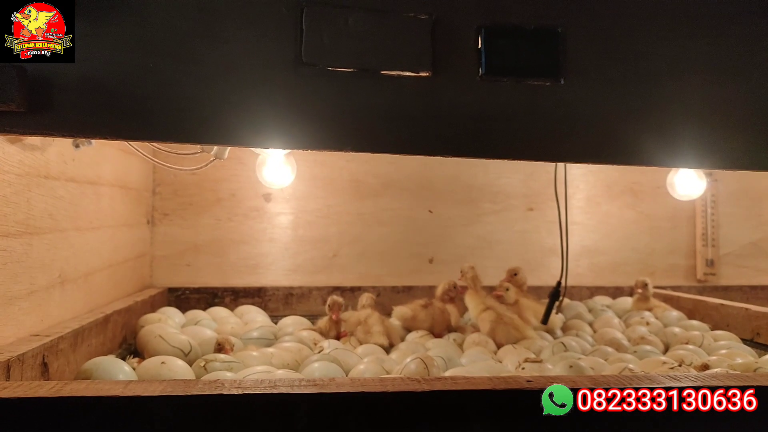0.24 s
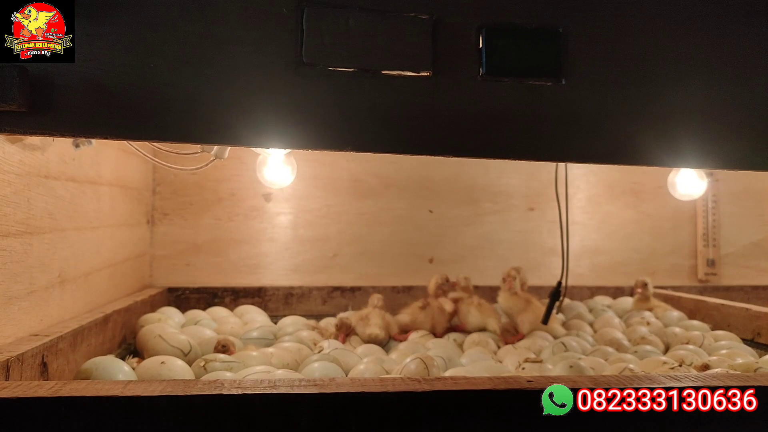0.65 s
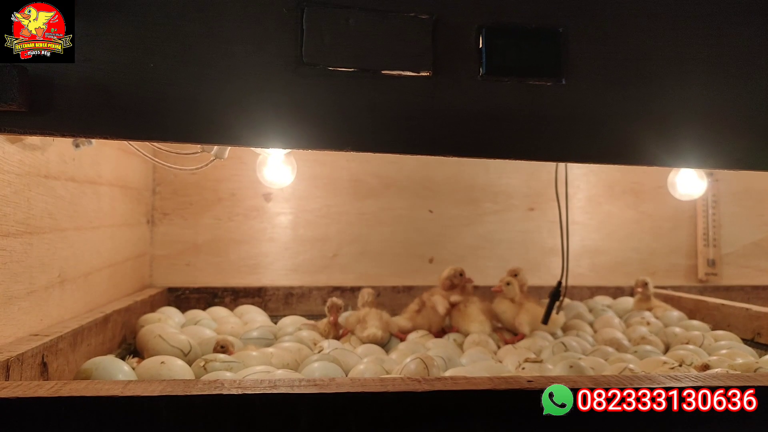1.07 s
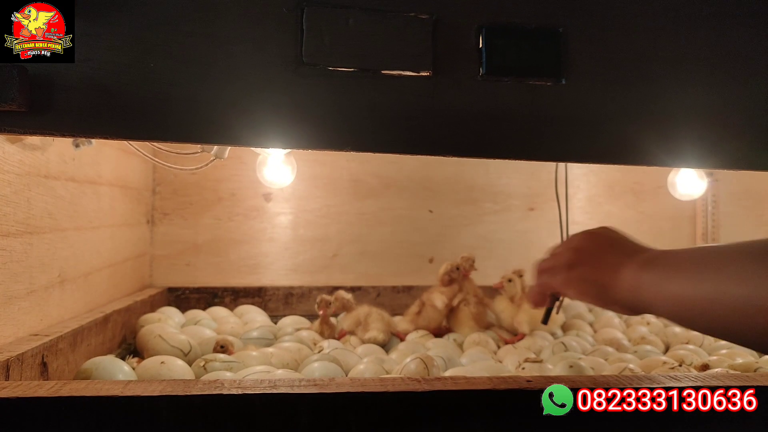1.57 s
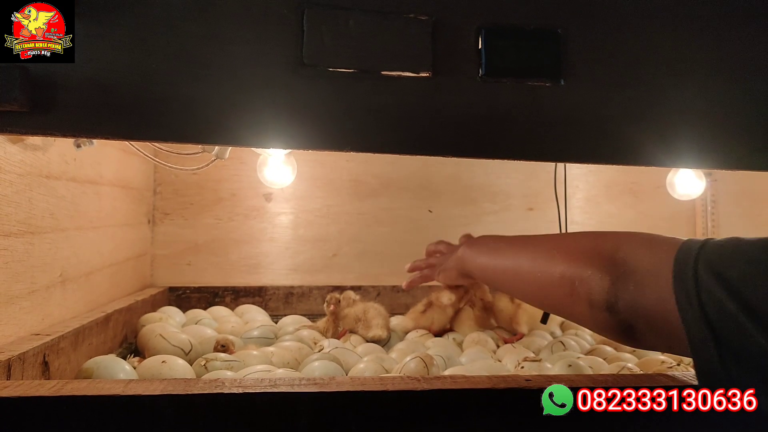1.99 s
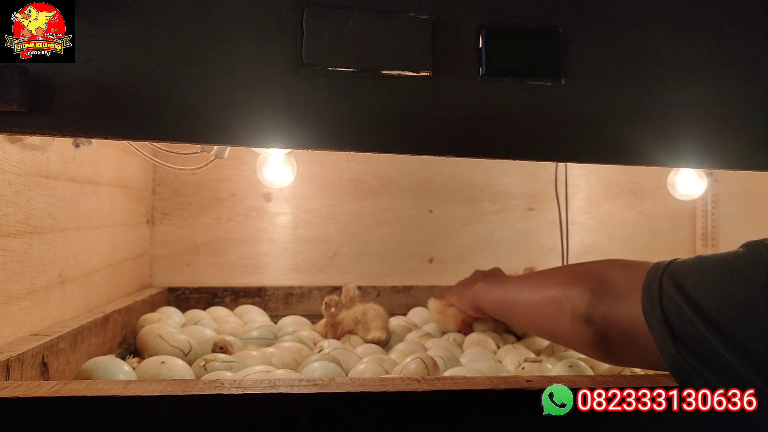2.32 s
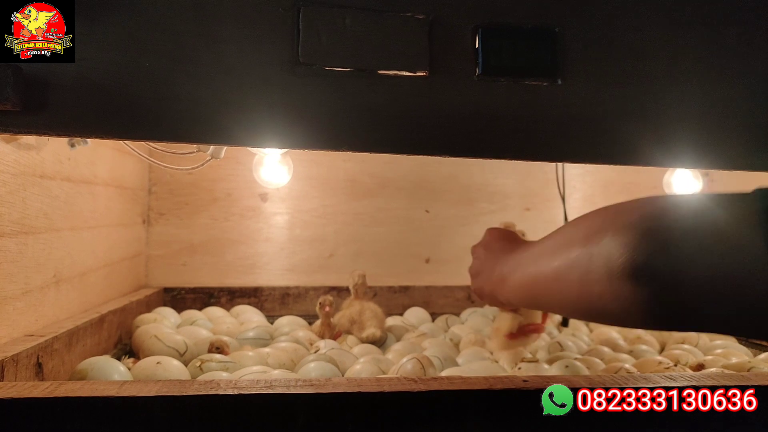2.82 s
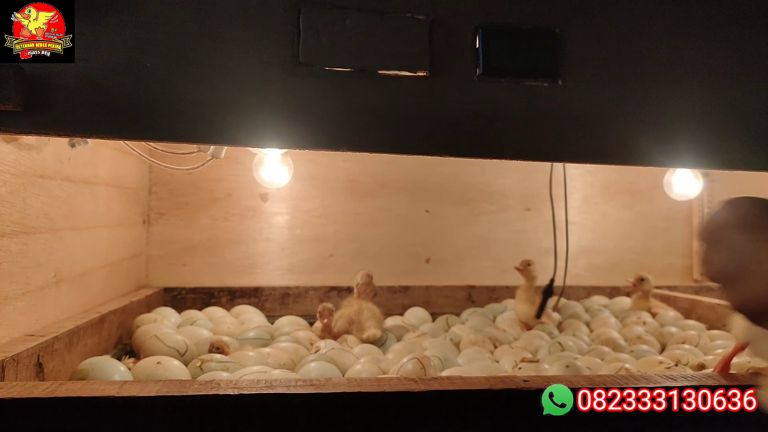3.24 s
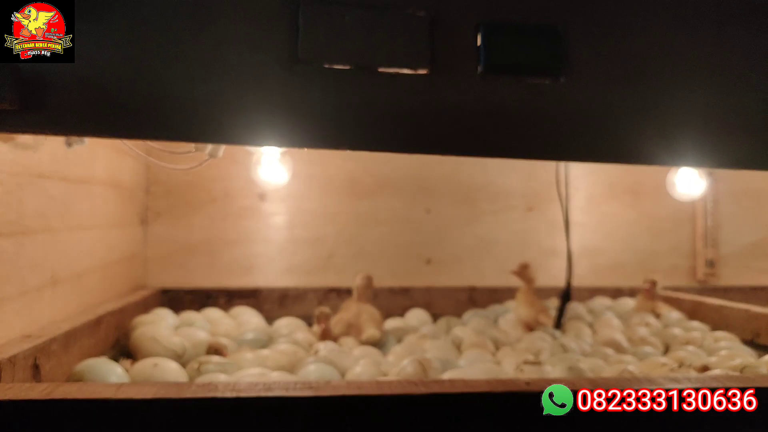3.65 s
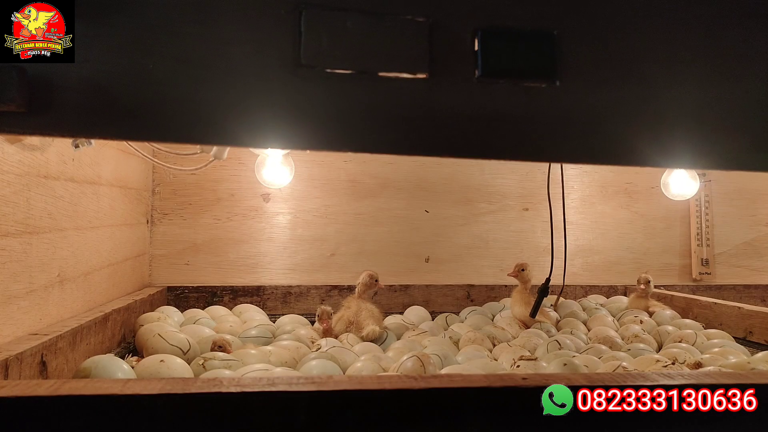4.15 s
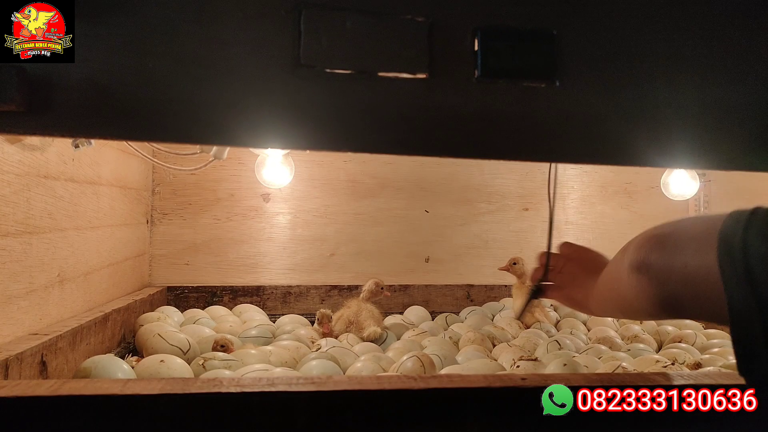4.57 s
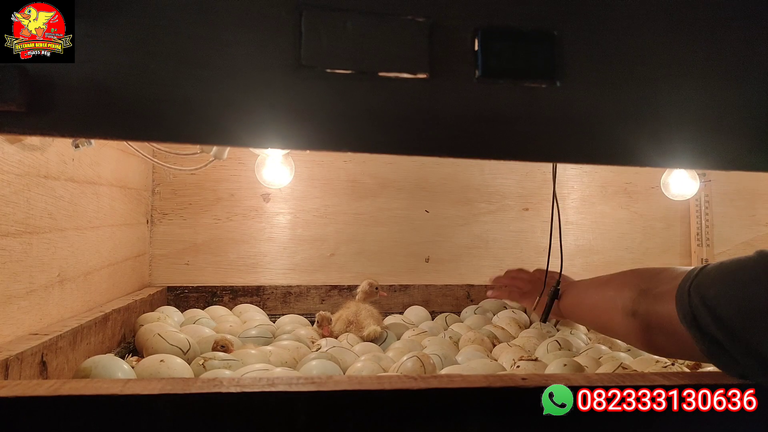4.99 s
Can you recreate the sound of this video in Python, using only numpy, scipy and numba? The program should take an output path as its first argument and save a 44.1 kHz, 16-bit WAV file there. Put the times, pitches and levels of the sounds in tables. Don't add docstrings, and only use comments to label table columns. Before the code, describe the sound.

A phone held close over a wooden box picks up shell taps and dull bumps first, then scattered thin peeps and a broad straw swish. Low tray knocks precede a carried duckling's climbing whistles and several shrill, raspy squeals, leaning left. Later a sharp double clack and grating hit the wood, followed by soft scuffing. Faint cricket chirps and low handling rumble lie beneath, in quiet hissy air.

```python
import sys
import numpy as np
from scipy import signal
from scipy.io import wavfile
from scipy.ndimage import uniform_filter1d, map_coordinates
from numba import njit

SR = 44100
rng = np.random.default_rng(int(sys.argv[2]) if len(sys.argv) > 2 else 0)


def linear_from_db(decibels):
    return 10 ** (np.asarray(decibels, float) / 20)


def wrap_up_sound(samples):
    columns = np.atleast_2d(samples).T
    tamed = np.clip(columns, -1, 1)
    steps = np.round(tamed * 32767).astype(np.int16)
    wavfile.write(sys.argv[1], SR, steps)


N = 229143
T = np.arange(N) / SR

# frequency in Hz, density in dB per Hz.
AIR_SPECTRUM = [(15, -31), (25, 4.5), (69, -6.5), (227, -14.5), (600, -21), (1600, -31), (2770, 6),
                (3930, -28.5), (6050, 2.5), (6550, 2), (7100, -12.5), (8580, -11), (11500, -67.5),
                (15500, -7)]
# time in seconds, level in dB, centre in Hz.
FAR_DRONE = [
    (3.25, -104, 1090),
    (3.28, -77, 1110),
    (3.374, -75.5, 1220),
    (3.442, -71.5, 1016),
    (3.716, -75.5, 960),
    (3.82, -88, 1240),
    (3.917, -67.5, 913),
    (4.078, -72.5, 1257),
    (4.15, -106, 1230),
]
# time in seconds, peak level in dB.
CHIRPS = [(0.326, -54), (0.4594, -55), (0.595, -57.5), (0.722, -60.5), (0.8544, -60), (1.522, -59),
          (1.653, -62.5), (1.9405, -75), (2.2248, -78), (2.3466, -64), (2.5002, -57), (2.635, -59),
          (2.7586, -61), (2.891, -52.5), (3.043, -63.5), (3.298, -55), (3.7, -61.5), (3.9709, -57),
          (4.2351, -65), (4.363, -56.5), (4.6314, -69), (4.762, -57.5), (4.8758, -59), (5.025, -60.5),
          (5.1597, -60.5)]
# peak in seconds, swell in seconds, fade in seconds, level in dB.
GRIPS = [
    (0.03, 0.13, 0.33, -66),
    (2.29, 0.4, 0.33, -80.5),
    (2.519, 0.17, 0.87, -74.5),
    (2.87, 0.14, 0.29, -68.5),
    (4.6, 0.24, 0.35, -60.5),
    (4.85, 0.19, 0.3, -65),
    (5.2, 0.32, .3, -73),
]
# time in seconds, peak level in dB, panel mode in Hz, ring T60 in seconds.
KNOCKS = [(0.054, -55, 180.7, 0.28), (0.133, -48, 377, 0.092), (0.361, -69, 345, 0.12),
          (2.092, -60.5, 143, 0.19), (2.23, -47.5, 152, 0.24), (2.443, -46.5, 155.6, 0.19),
          (2.821, -51, 124.5, 0.31), (3.277, -69.5, 306, 0.27), (4.505, -49.5, 123.4, 0.27),
          (4.573, -39, 131.4, 0.37), (5.045, -64.5, 259, 0.5)]
# time in seconds, level in dB, mode in Hz, ring T60 in seconds.
HOLLOW_KNOCKS = [
    (2.85, -60, 740, 0.3),
    (3.67, -66.5, 550, 0.46),
    (4.44, -32.5, 900, 0.041),
    (4.438, -41, 1800, 0.079),
    (4.962, -66.5, 960, 0.26),
    (4.565, -38, 1500, 0.091),
    (2.68, -71, 640, 0.24),
]
# time in seconds, peak in dB, bass share in dB, ring T60 in seconds.
SHELL_TAPS = [(0.0506, -44.5, -25, 0.25), (0.1395, -36.5, -3, 0.15), (0.3663, -39, 3, 0.21),
              (1.3179, -49, -13.5, 0.36), (2.0556, -46.5, -36, 0.33), (4.4364, -49, 16.5, 0.13),
              (4.5, -73, 26.5, 0.62), (4.5565, -49.5, -7, 0.25), (4.6877, -52, 15, 0.12),
              (5.0245, -59, 12, 0.15), (2.8075, -36, -30, .04), (.7208, -62, -8, .15),
              (1.0176, -50, -3, .3), (1.0565, -42, -10, .3), (3.5015, -40, -30, .04),
              (3.187, -40, -30, .04), (4.0746, -50, -8, .15), (2.3625, -64, -5, .2)]
# peak in seconds, swell in seconds, fade in seconds, level in dB.
SCRAPES = [
    (4.565, 0.04, .14, -39.5),
    (4.6, .04, .06, -43),
    (4.44, .008, .06, -58),
    (4, 0.0087, 0.067, -71),
]
# frequency in Hz, density in dB per Hz.
STRAW_SPECTRUM = [(71, -61), (120, -37.5), (276, -11.5), (509, -9), (623, -11.5), (733, -6), (1190, -8.5),
                  (1270, -3.5), (2390, 5.5), (3170, -1.5), (4000, -16), (5300, -2), (6700, -1),
                  (15500, -13.5)]
# peak in seconds, swell in seconds, fade in seconds,
# level in dB, bass cut in dB per octave.
SWISHES = [(0.0, .02, 0.094, -57, 2), (0.141, 0.032, 0.19, -53, 3), (0.379, 0.039, 0.12, -59, 18),
           (.71, 0.1, .6, -77, 21), (1.69, 0.03, .3, -70, 2.5), (1.082, 0.13, 0.44, -47, 3.5),
           (1.135, .1, .3, -43, .6), (1.195, 0.17, 0.25, -38.5, 0.2), (1.821, 0.14, 0.82, -60.5, 3),
           (2.081, 0.15, .28, -62.5, 3.5), (2.441, 0.14, 0.36, -63.5, 2.5), (2.811, 0.072, 0.081, -57.5, 4),
           (3.21, 0.2, 0.36, -67, 5), (3.515, 0.1, 0.16, -58.5, 7), (3.831, 0.048, 0.31, -65, 1.5),
           (4.091, 0.064, 0.2, -56.5, 1.5), (4.44, 0.033, 0.14, -62.5, 5), (4.589, 0.076, 0.23, -56, 22),
           (4.92, 0.25, 0.3, -70.5, 18)]
# peak in seconds, swell in seconds, fade in seconds,
# level in dB, treble cut in dB per octave.
SCUFFS = [(0.0, .02, 0.068, -46.5, 3.5), (0.058, .03, 0.064, -47, 3.5), (.15, 0.065, 0.37, -49.5, 7.5),
          (.39, 0.034, .33, -46, 7), (0.499, 0.3, 0.16, -55, 8.5), (2.27, 0.051, 0.08, -72, 48),
          (2.458, 0.053, 0.22, -62, 9.5), (2.82, 0.046, 0.18, -57.5, 4), (4.532, 0.13, 0.59, -61, 6),
          (4.57, 0.038, 0.14, -40, 6.5), (4.829, 0.093, 0.2, -53.5, 11), (5.08, 0.091, 0.23, -47.5, 8.5),
          (5.2, 0.19, .2, -55, 8)]
# time in seconds, right port lag in seconds, left minus right in dB.
HAND_PATH = [
    (0.2, .00039, 2.5),
    (1.1, .00023, .7),
    (2, .00021, -.5),
    (2.8, .00022, 1.5),
    (3.8, .00027, 3),
    (4.6, .00014, -.7),
    (5.1, -.00028, .9),
]
# start in seconds, length in seconds, first pitch in Hz, top in Hz, level in dB.
RISING_PEEPS = [(.316, 0.038, 2950, 3270, -59.5), (.42, 0.058, 3000, 3520, -67),
                (.741, 0.047, 2290, 2747, -60.5), (0.828, 0.034, 3160, 3270, -62),
                (2.352, 0.065, 2830, 3227, -60), (2.732, .07, 3200, 3460, -55),
                (3.462, 0.031, 2385, 3480, -62.5), (3.565, .06, 3900, 4300, -63),
                (3.635, .015, 2400, 3450, -61), (3.764, .012, 3400, 4300, -58),
                (3.48, .022, 3300, 3480, -51), (1.625, .07, 3350, 3750, -66),
                (3.985, .035, 4350, 4780, -64), (4.415, .03, 2500, 3300, -58), (.99, .025, 2500, 2800, -63),
                (.385, .05, 3200, 3480, -62), (3.932, .065, 2890, 4350, -56),
                (4.04, 0.034, 2466, 3060, -54), (4.316, .085, 2900, 4700, -58),
                (4.807, 0.062, 3516, 4600, -60), (5.121, 0.068, 2460, 3050, -56)]
# start in seconds, length in seconds, top in Hz, last pitch in Hz, level in dB.
FALLING_PEEPS = [(.515, .03, 2880, 2300, -61), (.535, .035, 2450, 2250, -58),
                 (.564, 0.042, 3470, 2960, -59), (0.653, .12, 3627, 2920, -61.5),
                 (.945, 0.042, 3400, 2700, -59), (1.416, 0.054, 3700, 2993, -57),
                 (1.678, 0.022, 3300, 3100, -58), (1.762, 0.03, 4700, 2700, -60),
                 (1.778, .02, 3400, 3100, -56), (2.933, 0.055, 3400, 3140, -58),
                 (0.26, 0.042, 3220, 2170, -67), (0.637, 0.057, 3170, 2220, -65),
                 (.44, 0.046, 3420, 2370, -68), (3.622, 0.074, 4250, 2300, -57.5),
                 (3.798, .03, 3800, 2700, -52), (4.014, .048, 4780, 2900, -54),
                 (1.805, .05, 2080, 1980, -62), (.375, .04, 3100, 2200, -60), (.96, .03, 3100, 2500, -62),
                 (4.87, .04, 3900, 3000, -62), (4.39, .036, 4700, 2700, -55)]
# start in seconds, length in seconds, foot in Hz, top in Hz, level in dB.
ARCHED_PEEPS = [(.222, .06, 2300, 3250, -61), (.352, .04, 2420, 3150, -54),
                (.535, 0.023, 2880, 3154, -53.5), (0.614, 0.07, 2050, 3424, -56),
                (0.866, 0.042, 2200, 2520, -53.5), (0.884, 0.041, 2720, 3380, -56.5),
                (1.38, 0.075, 3900, 4650, -61), (3.066, 0.086, 2650, 3104, -68.5),
                (3.222, .07, 2620, 3586, -55), (4.01, .05, 2900, 3500, -64), (.93, .045, 2500, 3100, -63),
                (.545, .06, 2900, 3720, -63), (.66, .04, 2100, 2600, -65), (.75, .05, 2300, 2750, -62),
                (4.152, 0.08, 3300, 4060, -66)]
CRY_OVERTONES_DB = (-20, -25)
# time in seconds, pitch in Hz, level in dB.
CLIMBING_WHISTLES = [
    [(2.712, 4268, -103), (2.722, 4016, -73), (2.734, 4192, -57), (2.77, 4541, -50), (2.78, 4563, -55),
     (2.784, 4686, -48), (2.81, 4821, -49), (2.812, 4802, -52)],
    [(3.118, 4445, -75), (3.144, 4449, -46), (3.171, 4506, -51)],
    [(3.172, 4690, -47), (3.176, 4751, -43), (3.184, 4902, -49), (3.19, 4853, -49)],
    [(3.445, 4389, -74), (3.455, 4417, -59), (3.471, 4440, -53), (3.478, 4535, -57)],
    [(3.479, 4513, -56), (3.491, 4490, -45), (3.508, 4489, -49)],
    [(3.72, 4310, -80), (3.726, 4384, -70), (3.742, 4483, -74), (3.76, 4476, -65), (3.774, 4777, -64),
     (3.778, 4708, -72), (3.782, 4541, -63), (3.8, 4505, -51), (3.828, 4612, -47)],
]
# time in seconds, pitch in Hz, level in dB.
CALM_WHISTLES = [
    [(2.515, 3962, -74), (2.521, 4138, -81), (2.527, 4383, -64), (2.537, 4340, -62), (2.553, 4869, -61),
     (2.567, 4762, -60), (2.573, 4434, -73), (2.585, 4400, -72)],
    [(2.9, 3433, -77), (2.906, 3380, -70), (2.914, 3688, -71), (2.936, 3751, -61), (2.958, 3743, -62),
     (2.972, 4134, -54), (2.98, 4113, -55), (2.99, 4124, -67)],
    [(4.85, 3176, -70), (4.856, 3164, -60), (4.876, 3444, -53), (4.886, 3437, -48), (4.902, 3713, -48),
     (4.938, 3777, -55), (4.944, 3964, -62), (4.955, 3723, -67)],
]
# time in seconds, pitch in Hz, level in dB.
CLEAR_FLIP = [
    [(3.825, 4648, -48), (3.827, 4719, -49), (3.833, 5523, -62), (3.837, 5951, -45), (3.843, 6010, -41),
     (3.865, 6052, -56)],
]
# start in seconds, length in seconds, pitch in Hz, level in dB,
# roughness from 0 to 1.
SQUEALS = [
    (2.803, 0.03, 6060, -33.5, 0.8),
    (3.182, .05, 6000, -40, 0.96),
    (3.5, 0.048, 6145, -31.5, 0.76),
    (3.83, .07, 6000, -39, .9),
    (4.057, 0.12, 6080, -45, 0.8),
]
# start in seconds, length in seconds, first pitch in Hz,
# last pitch in Hz, level in dB.
TUMBLES = [
    (2.836, .028, 4900, 2600, -46),
    (2.566, .014, 4800, 3900, -58),
    (2.982, .016, 4150, 3000, -55),
    (3.864, .01, 4600, 3800, -51),
    (3.205, .02, 4900, 4000, -54),
    (3.53, .014, 5000, 3300, -53),
    (4.94, .012, 3900, 4250, -54),
]
# time in seconds, # right port lag in
# seconds, left minus right in dB.
DUCKLING_PATH = [
    (2.7, .0002, 3.5),
    (3.2, .00022, 4),
    (3.45, .00045, 8),
    (3.8, .0005, 10),
    (4.1, .00048, 7),
    (4.8, .00028, 1.5),
]


@njit
def svf(x, hz, width):
    y, b, l = np.empty(len(x)), 0., 0.
    for i in range(len(x)):
        centre = hz[i % len(hz)]
        g, k = np.tan(np.pi * centre / SR), width / centre
        v = (b + g * (x[i] - l)) / (1 + g * (g + k))
        b, l, y[i] = 2 * v - b, l + 2 * g * v, k * v
    return y


def band(x, hz, width_hz):
    hz = np.atleast_1d(1. * hz)
    y = svf(svf(x, hz, 1. * width_hz), hz, 1. * width_hz)
    return y / np.std(y)


def noise_band(hz, width_hz):
    return band(rng.standard_normal(N), hz, width_hz)


def walk(rate):
    k = int(SR / rate)
    held = np.repeat(rng.standard_normal(N // k + 1), k)
    return 1.36 * uniform_filter1d(uniform_filter1d(held, k), k)[:N]


def colour(table, hz):
    table_hz, table_db = np.array(table).T
    return np.interp(np.log(hz), np.log(table_hz), table_db)


def bursts(times, dbs, rise, t60s):
    out = np.zeros(N)
    for s, db, t60 in zip(times, dbs, t60s):
        age = np.maximum(T[int(s * SR):int((s + 1.5 * t60) * SR)] - s, 0)
        out[int(s * SR):][:len(age)] += linear_from_db(db) * np.minimum(age / rise, 1) * 1000 ** (-age / t60)
    return out


def swell(t, table):
    s, rise, fade, db = np.transpose(table)[:4, :, None]
    return db - 40 * np.where(t < s, ((s - t) / rise) ** 2, (t - s) / fade)


def path(table):
    s, *columns = np.transpose(table)
    return [np.interp(T, s, column) for column in columns]


def ports(x, lag_s, pan_db):
    late = map_coordinates(x, [(T - lag_s) * SR], mode="mirror")
    return np.array([x * linear_from_db(pan_db / 2), late * linear_from_db(-pan_db / 2)])


def walls(x):
    t60_s, first_echo_s = 0.21, 0.0031
    age = np.arange(int(.4 * SR)) / SR
    tail = rng.standard_normal((2, len(age))) * 1000 ** (-age / t60_s)
    tail *= np.clip(age / first_echo_s - 1, 0, 1)
    return signal.oaconvolve(x[None], tail / np.sqrt(np.sum(tail ** 2) / 2), axes=1)[:, :N]


def hush(x):
    size = int(0.026 * SR)
    power = np.abs(uniform_filter1d(uniform_filter1d(x ** 2, size), size))
    db = 10 * np.log10(power + 1e-12)
    return np.clip(0.65 * (db + 63.5), -10, 0)


def air(hush_db):
    out, opposite = 0, np.array([[1], [-1]])
    for hz in 30 * 2 ** (np.arange(19) / 2):
        mid, side = (noise_band(hz, hz / 2.12) for _ in range(2))
        db = colour(AIR_SPECTRUM, hz) + 10 * np.log10(hz)
        db = db + 4 * walk(6) + 3 * walk(20)
        db = db + hush_db * min((hz / 2500) ** 2, 1)
        out = out + linear_from_db(db) * (mid + min(hz / 220.0, 1) * side * opposite)
    level_db = -71
    return out * linear_from_db(level_db) / np.std(out)


def drone():
    s, db, hz = np.transpose(FAR_DRONE)
    centre_hz = np.interp(T, s, hz)
    level_db = np.interp(T, s, db, -120, -120) + 1.9 * walk(13)
    return linear_from_db(level_db) * band(noise_band(centre_hz, 460), centre_hz, 460)


def cricket():
    s, db = np.transpose(CHIRPS)
    teeth = 1 + .7 * np.sin(2 * np.pi * 95 * T)
    return bursts(s - .012, db - 2, .015, .15 + 0 * s) * teeth * noise_band(6650, 450)


def rumble():
    rest_db = -88.5
    grip = linear_from_db(rest_db) + np.sum(linear_from_db(swell(T, GRIPS)), axis=0)
    common, opposed = (noise_band(75, 70) for _ in range(2))
    return grip * linear_from_db(2.5 * walk(25)) * (common + .3 * opposed * np.array([[1], [-1]]))


def knocks():
    out, blur = np.zeros(N), noise_band(287, 210)
    modes = ((1, 2), (1.55, -7.5), (2.3, -11))  # (pitch ratio, dB)
    for s, db, hz, t60 in list(KNOCKS) + list(HOLLOW_KNOCKS):
        at = int(s * SR)
        age = np.arange(min(int(.5 * SR), N - at)) / SR
        phase = 2 * np.pi * hz * np.cumsum(1 + 0.026 * walk(39.6)[:len(age)]) / SR
        ring = 0
        for ratio, mode_db in modes:
            ring = ring + linear_from_db(mode_db) * np.sin(ratio * phase) * 1000 ** (-age * ratio ** 0.38 / t60)
        if hz > 400:
            ring *= walk(260)[:len(age)]
        if hz < 400:
            ring += linear_from_db(-11) * blur[at:at + len(age)] * 1000 ** (-age / t60)
        out[at:at + len(age)] += linear_from_db(db) * ring * np.minimum(age / .009, 1)
    return out * linear_from_db(2.2 * walk(50))


def taps():
    s, db, bass_db, t60 = np.transpose(SHELL_TAPS)
    crack = bursts(s, db - 8.0, 0.0022, t60) * noise_band(6320, 4100)
    body = bursts(s, db + bass_db - 18.5, 0.0014, t60) * noise_band(890, 2300)
    return crack + body


def scrape():
    return np.sum(linear_from_db(swell(T, SCRAPES)), axis=0) * linear_from_db(3.1 * walk(150)) * noise_band(1080, 950)


def brushing():
    swish_knee_hz, scuff_knee_hz = 6000, 780
    t = T[::64]
    swish, scuff = swell(t, SWISHES), swell(t, SCUFFS)
    bass_cut, treble_cut = np.array(SWISHES)[:, 4:], np.array(SCUFFS)[:, 4:]
    grain, out = linear_from_db(1.61 * rng.exponential(size=N) + 3.2 * walk(200)), 0
    for hz in 150 * 2 ** (np.arange(21) / 3):
        thin = swish - bass_cut * max(np.log2(swish_knee_hz / hz), 0) ** 1.76
        thin = thin + 3 * max(np.log2(hz / 9000), 0)
        dull = scuff - treble_cut * max(np.log2(hz / scuff_knee_hz), 0)
        dull = dull - 6 * max(np.log2(400 / hz), 0)
        strokes = np.sqrt(np.sum(linear_from_db(thin) ** 2, axis=0) + np.sum(linear_from_db(dull) ** 2, axis=0))
        db = colour(STRAW_SPECTRUM, hz) + 10 * np.log10(hz / 5250) + 1.54 * walk(14)
        crackle = band(grain * rng.standard_normal(N), hz, hz / 2.7)
        out = out + np.interp(T, t, strokes) * linear_from_db(db) * crackle
    return out


def flock():
    def hook(top_hz, low_hz):
        return top_hz - .03 * (top_hz - low_hz)

    rises = [(s, n, low, top, hook(top, low), db) for s, n, low, top, db in RISING_PEEPS]
    falls = [(s, n, hook(top, low), top, low, db) for s, n, top, low, db in FALLING_PEEPS]
    arches = [(s, n, low, top, low, db) for s, n, low, top, db in ARCHED_PEEPS]
    return rises + falls + arches


def peeps(table):
    out, throb = np.zeros(N), walk(150)
    for s, length, first_hz, top_hz, last_hz, db in table:
        on = slice(int(s * SR), int((s + length) * SR))
        u = np.linspace(-1, 1, on.stop - on.start)
        up, down = np.sqrt(abs(top_hz - first_hz) + 1), np.sqrt(abs(top_hz - last_hz) + 1)
        crest = (up - down) / (up + down)
        climb_hz = top_hz - (top_hz - first_hz) * ((crest - u) / (crest + 1)) ** 2
        fall_hz = top_hz - (top_hz - last_hz) * ((u - crest) / (1 - crest)) ** 2
        hz = np.where(u < crest, climb_hz, fall_hz)
        phase = 2 * np.pi * np.cumsum(hz * (1 + .008 * throb[::-1][on])) / SR
        whistle = np.sin(phase) + linear_from_db(-22) * np.sin(2 * phase)
        out[on] += linear_from_db(db + 3.5 * throb[on]) * (1 - u ** 2) ** .3 * whistle
    return out


def cry_shapes():
    effort_db, flip_push_db, clear_rough, tumble_rough = 4.0, 3.0, .12, .5
    pushed_flip = [(s, hz, db + flip_push_db) for s, hz, db in CLEAR_FLIP[0]]
    for whistle in list(CLIMBING_WHISTLES) + list(CALM_WHISTLES) + [pushed_flip]:
        yield [(s, hz, db + effort_db, clear_rough) for s, hz, db in whistle]
    for s, length, hz, db, rough in SQUEALS:
        yield [(s, .8 * hz, db - 5.5, rough),
               (s + .16 * length, .98 * hz, db, rough),
               (s + .4 * length, 1.02 * hz, db - 2, rough),
               (s + length, .88 * hz, db - 21, rough)]
    for s, length, first_hz, last_hz, db in TUMBLES:
        yield [(s, first_hz, db - 3, tumble_rough),
               (s + .4 * length, .6 * first_hz + .4 * last_hz, db, tumble_rough),
               (s + length, last_hz, db - 6, tumble_rough)]


def cries():
    out, chaos, throb = np.zeros(N), walk(2500) + 1j * walk(2500), walk(130)
    steps = np.tanh(2 * walk(70))
    for table in cry_shapes():
        s, *columns = np.transpose(table)
        on = slice(int(s[0] * SR), int(s[-1] * SR))
        hz, db, rough = (np.interp(T[on], s, c) for c in columns)
        rough = np.clip(rough, 0, 1) ** 1.5
        swing = np.exp(2j * np.pi * np.cumsum(hz * (1 + .006 * steps[on])) / SR)
        tone = swing
        for k, overtone_db in enumerate(CRY_OVERTONES_DB, 2):
            tone = tone + linear_from_db(overtone_db) * swing ** k * (k * hz < 16000)
        tone = tone * (np.sqrt(1 - rough) + np.sqrt(rough / 2) * chaos[on])
        level_db = db + 3 + (3 + 3 * rough) * np.tanh(throb[on])
        out[on] += linear_from_db(level_db) * tone.imag * signal.windows.tukey(len(hz), .1)
    return out


def scene():
    hand = path(HAND_PATH)
    # (sound, right port lag s, left minus right dB, direct dB, echo dB)
    sources = [
        (drone(), .0002, .1, .1, -4),
        (cricket(), -.0002, -1.5, .1, -5),
        (knocks(), .0002, -1.5, .1, -12),
        (taps(), *hand, .1, -5),
        (scrape(), *hand, .1, -5),
        (brushing(), *hand, -1.0, -1.2),
        (peeps(flock()), .00042, 2.5, -2.5, -6.5),
        (cries(), *path(DUCKLING_PATH), -3, -10),
    ]
    direct = sum(linear_from_db(near_db) * ports(x, lag, pan_db) for x, lag, pan_db, near_db, _ in sources)
    echoes = walls(sum(linear_from_db(echo_db) * x for x, *_, echo_db in sources))
    return direct + echoes + air(hush(direct[0])) + rumble()


def top_cut(x):
    return signal.sosfilt(signal.butter(12, 15700, fs=SR, output="sos"), x)


def record(dry):
    ringing = np.array([svf(x, np.array([9200.]), 1700.0) for x in dry])
    mix = dry + np.array([[-.45], [.9]]) * ringing
    return top_cut(mix)


dry = scene()
out = record(dry)
wrap_up_sound(out)
```